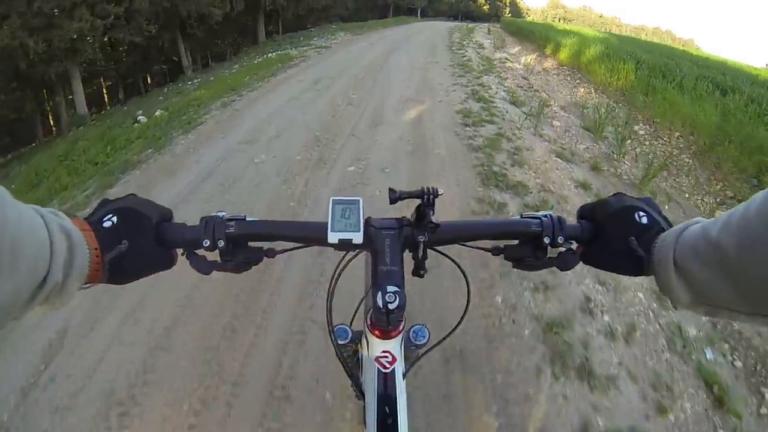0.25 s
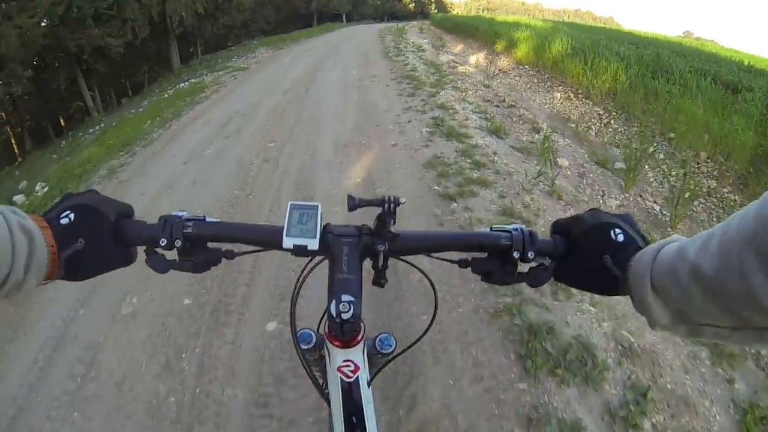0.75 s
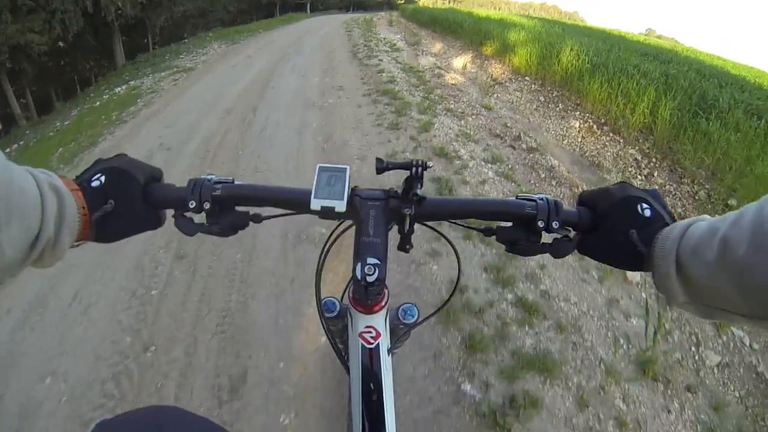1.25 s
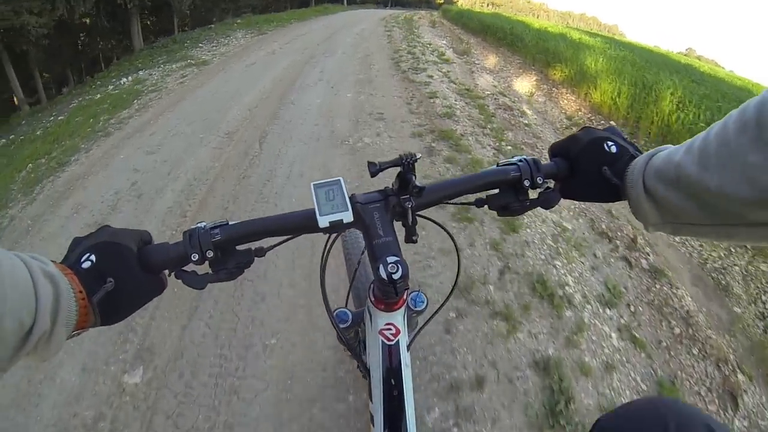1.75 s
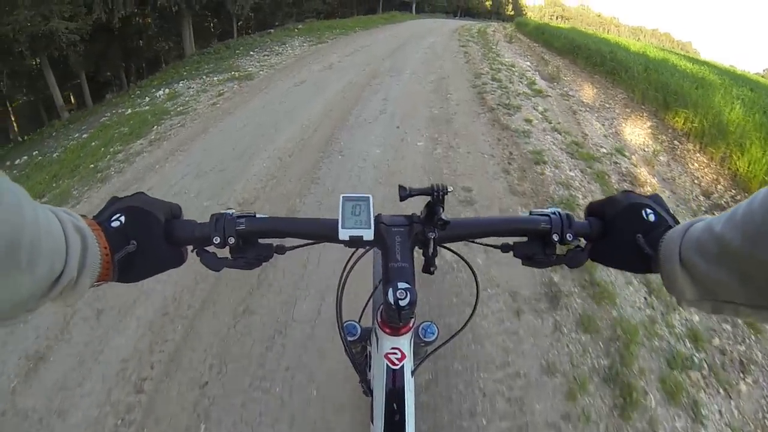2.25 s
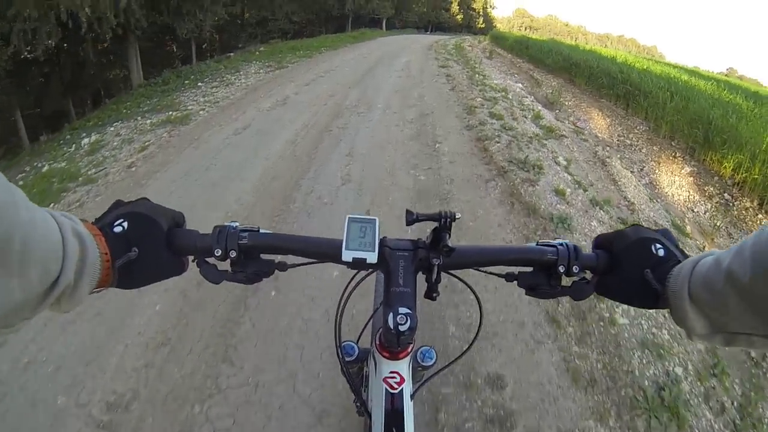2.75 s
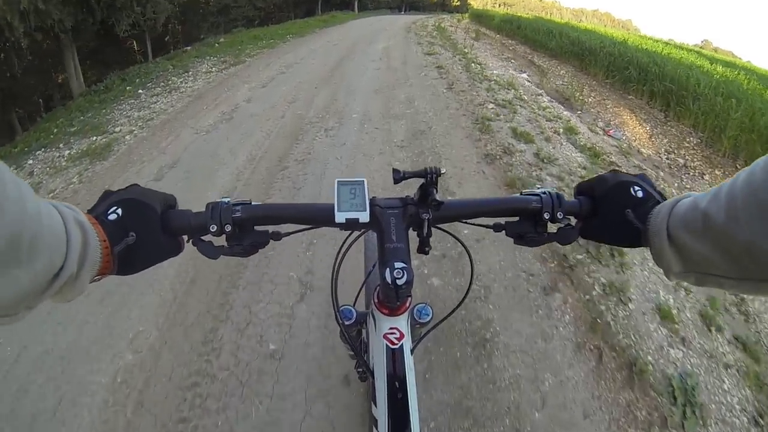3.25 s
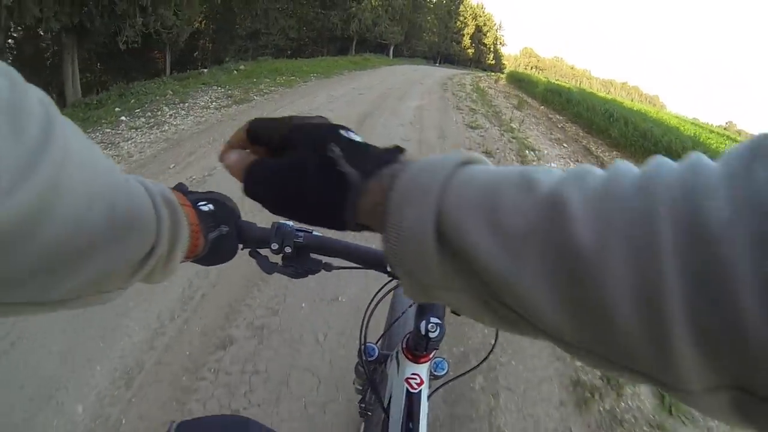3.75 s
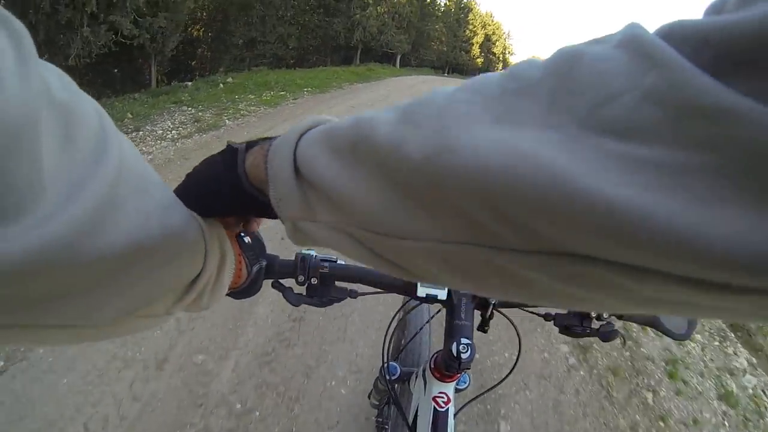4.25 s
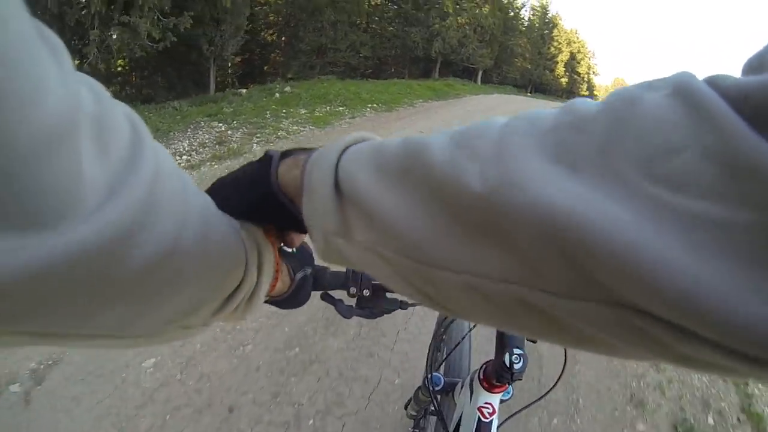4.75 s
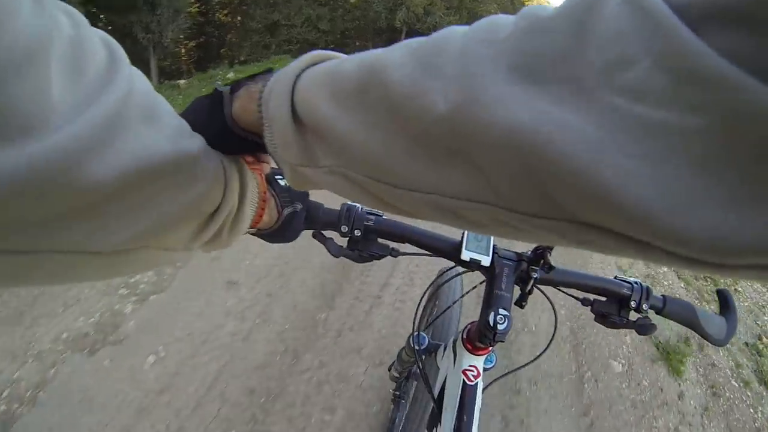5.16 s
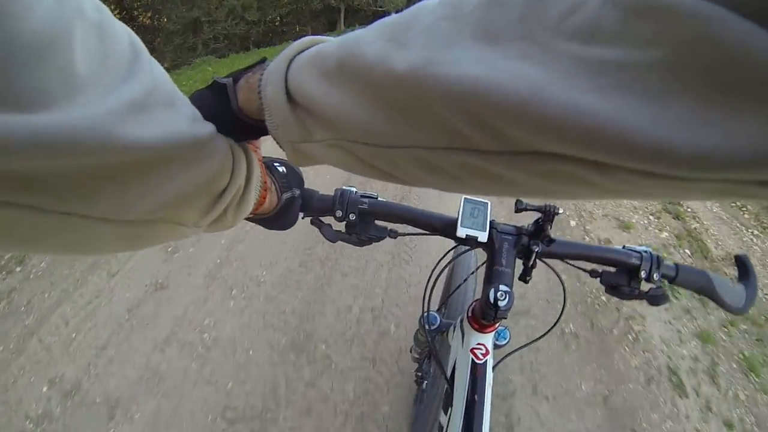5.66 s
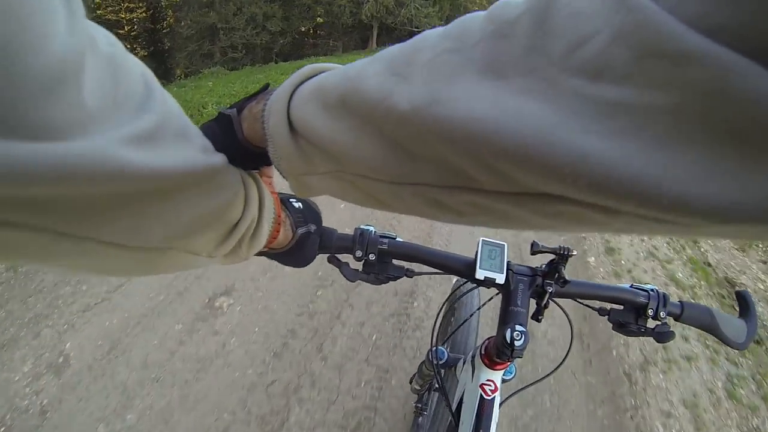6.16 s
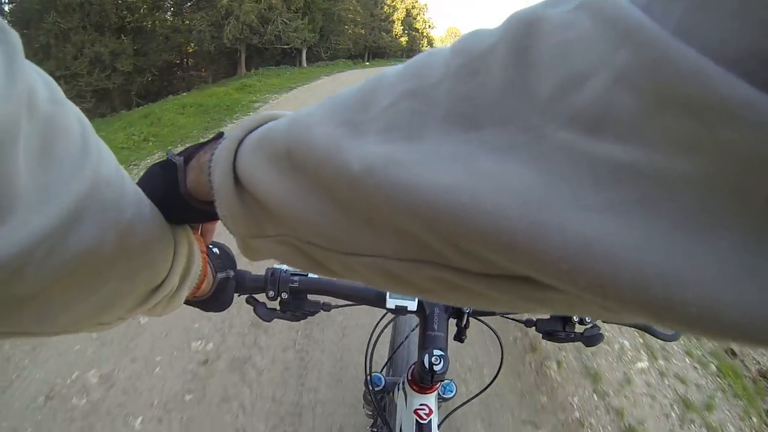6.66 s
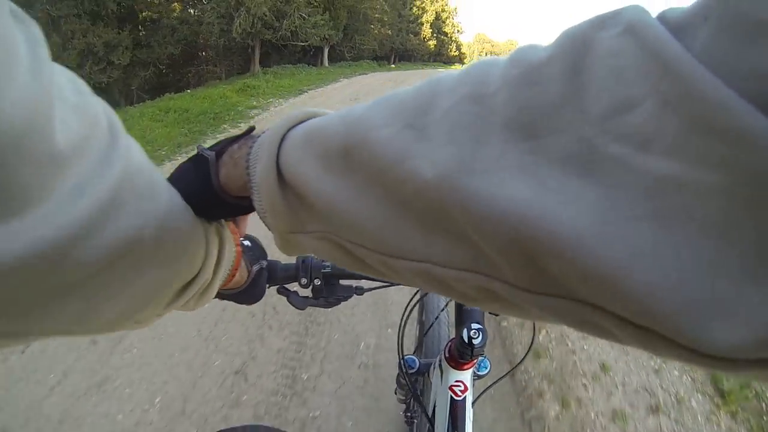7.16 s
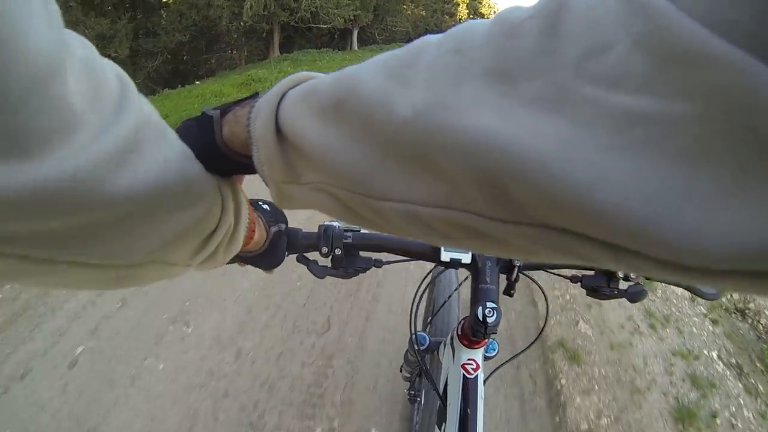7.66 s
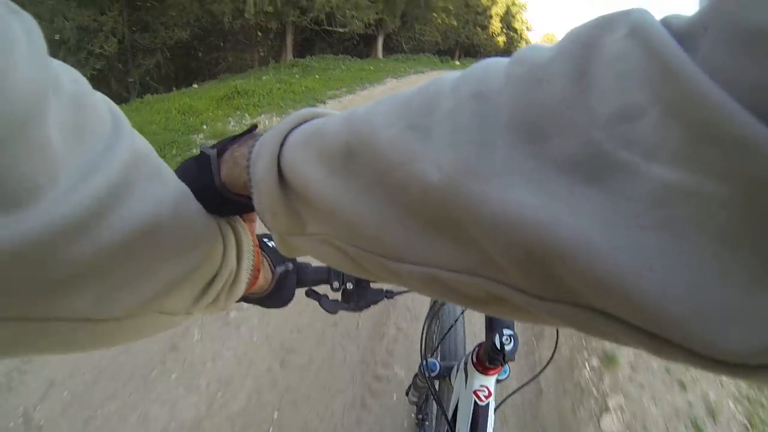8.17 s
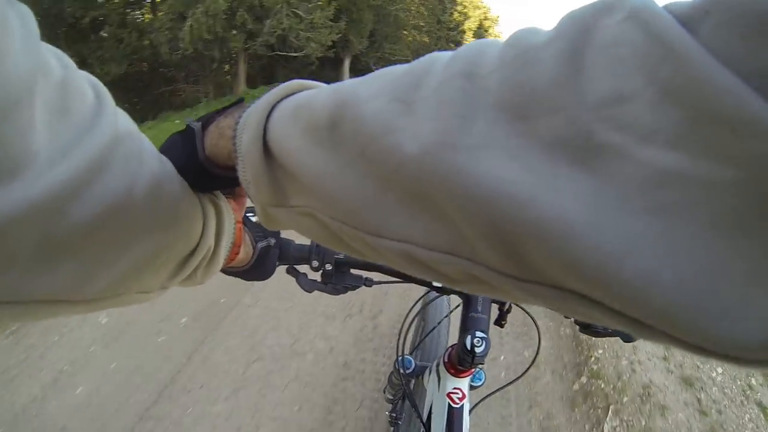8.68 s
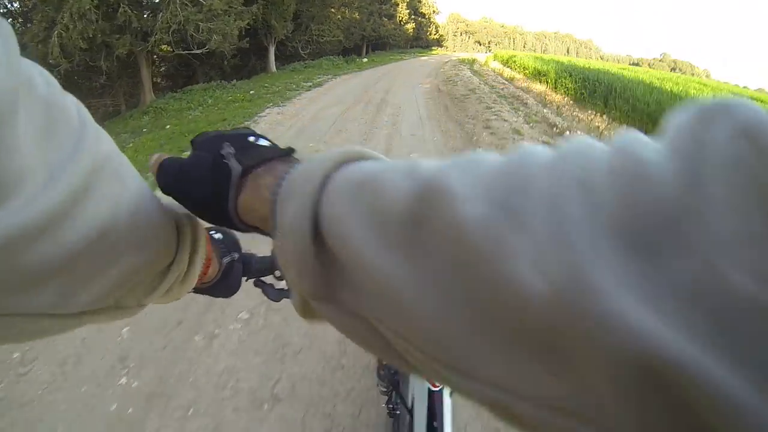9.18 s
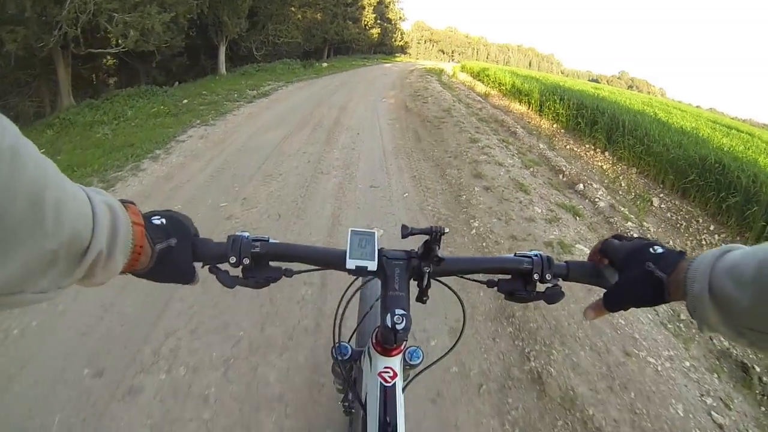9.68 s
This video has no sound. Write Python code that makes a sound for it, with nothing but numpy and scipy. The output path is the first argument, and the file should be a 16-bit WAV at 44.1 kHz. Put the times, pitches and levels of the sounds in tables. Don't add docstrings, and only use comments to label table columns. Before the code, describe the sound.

Riding a bicycle on a dirt and gravel track, heard from a camera in a plastic case on the rider's chest. Low wind buffeting and tyre rumble run throughout with grainy grit crunch and small stone ticks. A burst of hard knocks comes near four seconds as an arm crosses the chest, then the wind grows and loud, short plastic clacks recur irregularly from about six and a half seconds.

```python
import sys
import numpy as np
from scipy import signal
from scipy.fft import rfft, irfft
from scipy.io import wavfile
from scipy.ndimage import uniform_filter1d

SR = 44100
rng = np.random.default_rng(int(sys.argv[2]) if len(sys.argv) > 2 else 0)


def wav_record(signal):
    frames = np.transpose(np.atleast_2d(signal))
    bounded = np.clip(frames, -1, 1)
    quanta = np.round(bounded * 32767).astype(np.int16)
    wavfile.write(sys.argv[1], SR, quanta)


def to_linear_factor(level_db):
    exponent = np.asarray(level_db, float) / 20
    return 10 ** exponent


N = 437472
GRID = np.arange(N // 40 + 2) * 40


def rms_one(x):
    return x / np.sqrt(np.mean(x ** 2) + 1e-20)


def level_in_time(rows):
    s, level_db = np.transpose(rows)
    return np.interp(np.arange(N) / SR, s, level_db)


def gain_of(coarse_db):
    return np.interp(np.arange(N), GRID, to_linear_factor(coarse_db))


def swells_db(rows):
    s, swell_db, length_ms = np.transpose(rows)
    away = (GRID[:, None] / SR - s) / (.0004 * length_ms)
    return (swell_db * np.exp(-away ** 2)).sum(axis=1)


def drift(rate):
    r = np.exp(-80 * np.pi * rate / SR)
    noise = rng.standard_normal(len(GRID) + 2000)
    return rms_one(signal.lfilter([1], [1, -2 * r, r * r], noise)[2000:])


def ring(clicks, hz, t60):
    r, w = 1000 ** (-1 / (t60 * SR)), 2 * np.pi * hz / SR
    return signal.lfilter([0, np.sin(w)], [1, -2 * r * np.cos(w), r * r], clicks + 1e-18)


def coloured(source, spectrum, patchy_db, rate, apart=False):
    hz, level_db = np.transpose(spectrum)
    f = np.arange(N // 2 + 1) * SR / N + 1e-3
    shaped = rfft(source) * to_linear_factor(np.interp(np.log(f), np.log(hz), level_db, -150, -150))
    out, together = 0, drift(rate)
    step = 1.5 * np.log2(f / hz[0])
    for k in range(int(1.5 * np.log2(hz[-1] / hz[0])) + 2):
        share = np.clip(1 - np.abs(step - k), 0, 1)
        if apart:
            band = np.roll(irfft(shaped * np.sqrt(share), N), k * N // 9)
        else:
            band = irfft(shaped * share, N)
        out = out + band * gain_of(patchy_db * (0.6 * together + 0.41 * drift(rate)))
    return rms_one(out)


def grains(per_s, spread_db, bed_db):
    sizes = to_linear_factor(spread_db * np.minimum(rng.exponential(1, N), 5)) * rng.choice([-1, 1], N)
    born = rng.random(N) < per_s * gain_of(5 * drift(14)) / SR
    return rms_one(sizes * born) + to_linear_factor(bed_db) * rng.standard_normal(N)


# (frequency [Hz], level [dB per Hz])
HISS_SPECTRUM = [(2940, -2), (5000, 8), (7130, -14), (10300, -25), (13100, -11), (14900, -27), (15700, -44)]


def hiss():
    return to_linear_factor(-77.5) * coloured(rng.standard_normal(N), HISS_SPECTRUM, patchy_db=-1.0, rate=5)


def whine():
    return to_linear_factor(-95) * np.sin(2 * np.pi * 12647 * np.arange(N) / SR)


# (time [s], level [dB])
INSECT_LEVEL = [(0, -85), (3.9, -81), (4.3, -84), (9, -85.5), (9.92, -81)]


def insects():
    centre_hz, width_hz = 10080, 250
    band = rms_one(ring(rng.standard_normal(N), centre_hz, 1.6 / width_hz))
    return to_linear_factor(level_in_time(INSECT_LEVEL)) * gain_of(2.3 * drift(7.8)) * band


# (time [s], level [dB])
AIRFLOW = [(0, -41.5), (.6, -41.5), (1.3, -41), (1.8, -43.5), (2.8, -44), (3.8, -43), (4.5, -41.5),
           (5.2, -39.5), (6.2, -36), (7.0, -39), (7.6, -34.5), (8.3, -38), (9.1, -34.5), (9.35, -41),
           (9.92, -40.5)]
# (time [s], swell [dB], length [ms])
GUSTS = [(.08, 0, 55), (.2, -1, 80), (.55, 5.5, 220), (.85, -1, 160), (1.06, 4.5, 160), (1.3, 8.5, 56),
         (1.58, 1, 250), (2.48, 1.5, 200), (3.2, 3, 140), (4.33, 2.5, 270), (4.57, 2, 80), (4.7, 9, 105),
         (4.86, 5, 51), (5.02, 5.5, 110), (5.19, 7.5, 150), (5.4, 5.5, 310), (5.66, 11, 68),
         (5.9, 3.5, 200), (6.41, 7, 88), (6.75, 3.5, 360), (7.1, 2, 110), (7.27, 8.5, 69), (7.68, 1.5, 120),
         (7.87, 3, 170), (8.19, 3, 130), (8.45, 5, 110), (8.66, 5.5, 130), (9.01, 3.5, 120), (9.2, 4, 140),
         (9.53, 2.5, 260)]
# (frequency [Hz], level [dB per Hz])
WIND_SPECTRUM = [(8.8, -42), (15, -1.5), (48, 3), (100, -3.5), (201, -14), (234, -13.5), (400, -35.5),
                 (520, -29), (880, -120)]


def wind():
    gust_db = level_in_time(AIRFLOW) + np.interp(np.arange(N), GRID, swells_db(GUSTS))
    air = coloured(rng.standard_normal(N), WIND_SPECTRUM, patchy_db=1.75, rate=5.0)
    above_78_hz = signal.butter(2, 78, "high", fs=SR, output="sos")
    upper = signal.sosfiltfilt(above_78_hz, air)
    strength_db = uniform_filter1d(gust_db, size=SR // 6) + 38.0
    eddies = gain_of(1.6 * drift(20))
    return to_linear_factor(gust_db) * (air - upper + upper * to_linear_factor(0.47 * strength_db) * eddies)


# (time [s], level [dB])
ROAD_LOAD = [(0, -43), (.66, -40.5), (.95, -42.5), (1.4, -42.5), (2.1, -45), (2.8, -43), (3.2, -40.5),
             (3.45, -38), (3.75, -42.5), (4.7, -41.5), (5.3, -41), (6.6, -41), (7.1, -38), (7.8, -42),
             (8.2, -39), (9.05, -43.5), (9.25, -40), (9.92, -43.5)]
# (time [s], swell [dB], length [ms])
LOOSE_PATCHES = [(.02, 3.5, 60), (0.413, 5, 28), (0.481, 7, 36), (0.573, 4, 33), (.67, 0.5, 60),
                 (0.9, 10, 53), (1.03, 7.5, 110), (1.187, 4.5, 50), (2.017, 4.5, 170), (2.32, 4.5, 150),
                 (2.385, 5.5, 39), (2.688, 4.5, 28), (3.06, 2.5, 75), (3.29, 6.5, 52), (3.462, 2.5, 54),
                 (3.83, 3, 71), (4.167, 7, 53), (4.69, 4, 120), (4.85, 2.5, 41), (5.03, 2, 60),
                 (5.264, 5, 13), (6.793, 6, 25), (6.884, 5.5, 50), (7.573, 5, 18), (8.34, 8.5, 14),
                 (8.8, 5.5, 74), (9.2, 6.5, 74), (9.45, 2.5, 37), (9.714, 6, 38), (9.8, 4, 250)]
# (frequency [Hz], level [dB per Hz])
TYRE_SPECTRUM = [(88, -52), (150, -4.5), (189, -14), (227, -3.5), (284, 0.5), (318, -3), (436, -3.5),
                 (635, -7.5), (852, -7.5), (1440, -20.5), (1700, -31.5), (2210, -28), (3740, -120)]


def tyre_rumble(load_db, patch_db):
    rumble = coloured(grains(900, 3.2, bed_db=4), TYRE_SPECTRUM, patchy_db=2.2, rate=14.6)
    return rumble * to_linear_factor(load_db) * gain_of(0.88 * patch_db)


# (frequency [Hz], level [dB per Hz])
GRIT_SPECTRUM = [(820, -3.5), (1400, -12), (1580, -9.5), (1830, -2.5), (2050, -4.5), (2470, -7),
                 (3480, -13), (4660, -25.5), (5480, -27.5), (6150, -51), (8000, -44), (10400, -76),
                 (17600, -120)]


def grit_crunch(load_db, patch_db):
    grit_db = -50.5 + 0.33 * (load_db - load_db.mean())
    crunch = coloured(grains(800, 5.9, bed_db=3.0), GRIT_SPECTRUM, patchy_db=2.5, rate=32, apart=True)
    return crunch * to_linear_factor(grit_db) * gain_of(0.81 * patch_db)


# (time [s], swell [dB], length [ms])
RUSTLES = [(.55, 3, 200), (1.1, 4, 380), (3.5, 3, 270), (3.8, 3, 390), (4.27, 7.5, 190), (4.39, 2, 60),
           (4.9, 4.5, 420), (5.47, 5, 170), (6.02, 2, 240), (7.05, 3, 670), (8.25, 2, 200), (8.9, 1, 120),
           (9.3, 8, 310), (9.8, 2, 200)]
# (frequency [Hz], level [dB per Hz])
CLOTH_SPECTRUM = [(3530, -37), (6000, -3), (7120, -4.5), (7790, -6.5), (8250, -4.5), (8720, -3), (9490, -8),
                  (10600, -7), (11800, -11.5), (13500, -12.5), (15200, -20)]


def cloth():
    rubbing = coloured(grains(1500, 3.8, bed_db=2.0), CLOTH_SPECTRUM, patchy_db=1.0, rate=29)
    return rubbing * gain_of(-75 + swells_db(RUSTLES))


# (ratio to its pitch [-], level [dB])
SNAP_PARTIALS = [(1.0, -1), (1.2, -5), (1.52, -9.5), (1.95, -18)]
# (time [s], peak [dB], pitch [Hz])
SNAPS = [(.0608, -47, 4300), (.097, -50, 4500), (.372, -36, 1950), (0.6553, -38, 2290), (.7, -38, 1300),
         (.895, -41, 2000), (1.074, -65, 3600), (1.185, -33, 1500), (1.2446, -41, 4100),
         (1.3392, -30, 2380), (1.395, -48, 5000), (1.647, -34, 1990), (1.8542, -51, 5400),
         (1.8911, -49, 4800), (3.021, -38, 1920), (3.1038, -46, 4200), (3.2281, -34, 2000),
         (3.5992, -65, 5000), (3.2842, -34, 3300), (3.6636, -36, 4000), (3.735, -52, 5500),
         (3.7803, -31, 1850), (3.9188, -38, 10300), (3.9196, -21, 2800), (3.925, -22, 2800),
         (4.15, -35, 1900), (4.1624, -39, 3900), (4.2398, -47, 4800), (4.288, -26, 1680),
         (4.2895, -31, 2620), (4.3166, -40, 4400), (4.415, -37, 2200), (4.527, -50, 8200),
         (4.538, -50, 6200), (4.561, -25, 2320), (4.561, -40, 6900), (4.6069, -30, 1900),
         (5.033, -33, 2450), (5.0958, -33, 2100), (5.3038, -45, 3700), (5.345, -48, 3300),
         (5.3798, -14.5, 2340), (5.4016, -24, 2160), (5.4809, -42, 4400), (5.628, -62, 8300),
         (5.79, -33.5, 2300), (5.878, -40, 1920), (6.0057, -38, 1850), (6.765, -30, 2650),
         (6.8758, -30, 2300), (7.0788, -35, 1680), (7.3135, -33, 2300), (7.5218, -20, 2380),
         (7.7474, -21, 1680), (9.1316, -46, 4400), (9.5682, -46, 5200), (9.7068, -33, 1490),
         (9.885, -45, 4600)]


def snaps():
    decay_cycles, rise_cycles = 20, 1.4
    s, peak_db, hz = np.transpose(SNAPS)
    out, span = np.zeros(N + 600), np.arange(600)
    cycles = hz[:, None] * span / SR
    rise = np.sin(np.pi / 2 * np.minimum(cycles / rise_cycles, 1)) ** 2
    rise = rise * to_linear_factor(30 * rise_cycles / decay_cycles)
    for ratio, db in SNAP_PARTIALS:
        height = to_linear_factor(db + peak_db[:, None] - 60 * cycles / decay_cycles)
        rung = height * np.sin(2 * np.pi * ratio * cycles) * rise
        np.add.at(out, np.round(s * SR).astype(int)[:, None] + span, rung)
    return out[:N]


# (frequency [Hz], level [dB], t60 [s])
MOUNT_MODES = [(630, -25, 0.025), (772, -2.5, 0.044), (983, 0.5, 0.02), (1162, 2.5, 0.019),
               (1354, -7, 0.015)]
# (frequency [Hz], level [dB], t60 [s])
DOOR_MODES = [(1680, -11, 0.009), (1987, 8.5, 0.025), (2065, 3.5, 0.026), (2290, -15, .012)]
# (frequency [Hz], level [dB], t60 [s])
SHELL_MODES = [(2630, 9.5, 0.021), (2940, 3, 0.021), (3280, 6, 0.027), (3600, -14, 0.0069),
               (4040, -34, 0.0077)]
# (frequency [Hz], level [dB], t60 [s])
TICK_MODES = [(4440, 2, 0.012), (5430, 6, 0.01), (5850, -1, 0.0089), (6900, -2.5, 0.0034),
              (8750, -1, 0.004), (10800, 1, 0.0031)]


def knocks(at_s, part_db, chatter_ms, scatter_db, ringing, chatter=0.14):
    passed_hz = [(480, 2400), (1676, 2410), (2440, 3680), (4080, 9500)]
    parts = [MOUNT_MODES, DOOR_MODES, SHELL_MODES, TICK_MODES]
    out, span = np.zeros(N + 1600), np.arange(1600)
    draw = rng.standard_normal((len(at_s), 1600 + 6))
    chatter_ms = np.broadcast_to(np.maximum(chatter_ms, .2), len(at_s))[:, None]
    contact = chatter * draw[:, 6:] * np.exp(-(600 * span / SR / chatter_ms) ** 1.3)
    contact[:, 0] = 1
    dryness = np.clip(part_db[2] - part_db[1] + 5.5, 0, 9)[:, None]
    muted = np.exp(-45 * dryness * span / SR)
    for modes, edges_hz, peak_db in zip(parts, passed_hz, part_db):
        rung = 0
        for k, (hz, db, t60) in enumerate(modes):
            height = to_linear_factor(db + scatter_db * draw[:, [k]])
            rung = rung + height * ring(contact, hz, ringing * t60)
        if modes is not MOUNT_MODES:
            rung = rung * muted
        rung = signal.sosfilt(signal.butter(3, edges_hz, "band", fs=SR, output="sos"), rung)
        rung = rung * to_linear_factor(peak_db)[:, None] / np.abs(rung).max(axis=1, keepdims=True)
        np.add.at(out, np.round(at_s * SR).astype(int)[:, None] + span, rung)
    return out[:N]


def single_mode(s, peak_db, hz, t60):
    clicks = np.zeros(N)
    clicks[np.round(s * SR).astype(int)] = to_linear_factor(peak_db)
    return ring(clicks, hz, t60)


def chest_plate(s, mount_db):
    return single_mode(s, mount_db - 17.5, hz=209, t60=0.025)


def mount_clip(s, peak_db):
    return single_mode(s, peak_db, hz=776, t60=0.067)


# (time [s], peak [dB], bright tick [dB re peak])
STONES = [(0.0246, -41, -12), (0.225, -45, -40), (0.301, -41, -15), (0.3638, -35.5, -32), (0.468, -38, -18),
          (0.5384, -39, -27), (0.5632, -36.5, -20), (0.6558, -33.5, -20), (0.878, -36, -19),
          (0.9153, -37, -38), (0.949, -40, -16), (1.006, -34, -24), (1.5784, -32.5, -37),
          (1.7539, -36.5, -22), (2.1463, -31.5, -32), (3.048, -37, -34), (3.8457, -36, -32),
          (3.867, -33.5, -22), (4.4942, -37, -31), (5.445, -40, -18), (5.4672, -38, -25),
          (5.5262, -35.5, -24), (5.5543, -38, -27), (6.785, -34.5, -33), (6.8453, -36, -24),
          (6.971, -34, -21), (7.0334, -32.5, -36), (7.079, -35, -32), (7.1082, -33, -29),
          (9.3235, -33, -22)]


def stones():
    s, peak_db, tick_db = np.transpose(STONES)
    part_db = [peak_db - 7, peak_db - 4, peak_db - 2, peak_db + tick_db + 8.5]
    return knocks(s, part_db, chatter_ms=2.5, scatter_db=0.0, ringing=0.48)


CLICK_SHARES = [0.5, 1.3, -2.5, -9]
# (time [s], door peak [dB])
CLICKS = [(1.3392, -39), (4.518, -40), (8.3344, -56), (7.93, -47), (8.0, -43), (8.912, -60), (9.7077, -41),
          (9.766, -33), (9.8188, -35)]


def clicks_on_shell():
    s, peak_db = np.transpose(CLICKS)
    part_db = [peak_db + share_db for share_db in CLICK_SHARES]
    return knocks(s, part_db, chatter_ms=2.2, scatter_db=1.0, ringing=0.77)


# (time [s], door peak [dB], shell [dB re door])
TAPS = [(1.4742, -29, -16), (1.485, -33, -18), (1.718, -33.5, -22), (2.293, -35, -23), (3.257, -39, -2),
        (4.7232, -35, -24), (4.733, -31.5, -21), (5.0952, -36, -14), (5.9269, -34, -6),
        (6.5728, -30.5, -15), (6.6196, -32.5, -26), (6.9314, -21.5, -17), (6.9394, -26.5, -20),
        (6.9467, -34, -14), (7.552, -35.5, -3), (8.463, -40, -1), (8.743, -37, -12), (8.757, -33.5, -24),
        (9.045, -37, -14), (9.0917, -43, -22)]


def taps():
    s, door_db, shell_db = np.transpose(TAPS)
    part_db = [door_db - 1.5, door_db, door_db + shell_db + 2.5, door_db - 31]
    return knocks(s, part_db, chatter_ms=2.2, scatter_db=-5.5, ringing=0.74)


# (time [s], door peak [dB], mount [dB re door], buzz [ms])
RATTLES = [
    (4.077, -51, 19.5, 16),
    (4.158, -45.5, 14.5, 30),
    (6.622, -45, 11, 7.4),
    (8.746, -34, -21, 12),
    (9.088, -34.5, -15, 8.7),
    (9.226, -31, -18, 16),
]


def rattles():
    s, door_db, mount_db, buzz_ms = np.transpose(RATTLES)
    part_db = [door_db + mount_db, door_db, door_db - 16, door_db - 30]
    buzz = knocks(s, part_db, buzz_ms, scatter_db=3.0, ringing=2.4, chatter=1.5)
    return buzz + mount_clip(s + .008, door_db + mount_db - 1)


THUD_SHARES = [2, -13.5, -18.5, -35]
# (time [s], mount peak [dB], chatter [ms])
THUDS = [
    (2.0193, -39, 2.4),
    (3.2914, -36, 2.3),
    (3.9245, -11.5, 3.4),
    (3.9306, -28, 1.6),
    (3.9629, -15, 2.6),
    (3.9677, -18, 1.9),
    (3.9754, -25, 5.1),
    (4.149, -32, 2.7),
    (6.8753, -39, 1.7),
]


def thuds():
    s, mount_db, chatter_ms = np.transpose(THUDS)
    part_db = [mount_db + share_db for share_db in THUD_SHARES]
    body = knocks(s, part_db, chatter_ms, scatter_db=3.5, ringing=0.95)
    return body + chest_plate(s, mount_db) + mount_clip(s, mount_db - 3.5)


# (time [s], door peak [dB], mount [dB re door], shell [dB re door], bright tick [dB re door])
SLAPS = [(3.182, -27, -6, -29, -34), (3.285, -24.5, 5, -7.5, -30), (3.9186, -12, 2, -6.5, -19),
         (4.2886, -30.5, -9, -7, -12), (4.56, -18, -1, -17.5, -17), (6.4656, -5.5, -9, -17, -21.5),
         (6.4744, -21, -23, -25, -28), (6.546, -13, -6.5, -14.5, -20.5), (6.9111, -8, -10, -12.5, -18.5),
         (6.9248, -20, -8, -13, -20), (7.3412, -27.5, -3, -10, -23), (7.5024, -15.5, -10.5, -15, -25),
         (7.522, -26, -8, 3, -22), (7.7473, -27.5, -6, -3, -6), (8.1945, -1.5, -15.5, -8.5, -14),
         (8.2051, -18.5, -10, -7, -16), (8.538, -17.5, -15, -14, -17.5), (8.6838, -7.5, -9.5, -12.5, -18),
         (9.0174, -5, -15.5, -12.5, -17.5), (9.1725, -17.5, -13.5, -10.5, -19.5),
         (9.232, -27, -5, -7.5, -38)]


def slaps():
    s, door_db, mount_db, shell_db, tick_db = np.transpose(SLAPS)
    part_db = [door_db + mount_db + 3.5, door_db, door_db + shell_db + 5, door_db + tick_db]
    body = knocks(s, part_db, chatter_ms=2.38, scatter_db=0.5, ringing=1.0, chatter=0.069)
    lens_ring = single_mode(s, door_db + tick_db - 26, hz=5400, t60=0.05)
    return body + lens_ring + chest_plate(s, door_db + mount_db)


def scene():
    load_db, patch_db = level_in_time(ROAD_LOAD), swells_db(LOOSE_PATCHES)
    background = hiss() + whine() + insects() + wind()
    riding = tyre_rumble(load_db, patch_db) + grit_crunch(load_db, patch_db) + cloth()
    small_hits = snaps() + stones() + clicks_on_shell() + taps()
    jolts = rattles() + thuds() + slaps()
    return (background + riding + small_hits + jolts)[None]


def low_pass(x):
    return signal.sosfilt(signal.butter(12, 15860, fs=SR, output="sos"), x)


def record(dry):
    overloaded = np.clip(dry, -.93, .93)
    mix = signal.sosfilt(signal.butter(10, 15300, fs=SR, output="sos"), overloaded)
    return low_pass(mix)


dry = scene()
out = record(dry)
wav_record(out)
```